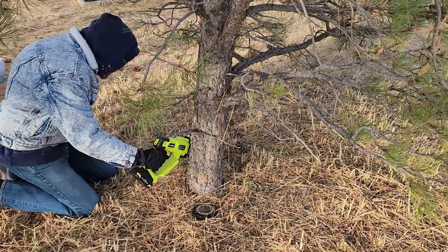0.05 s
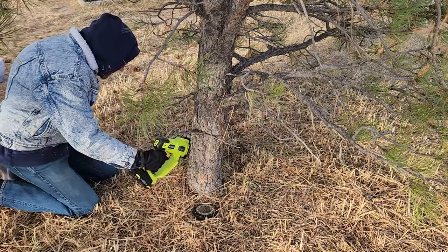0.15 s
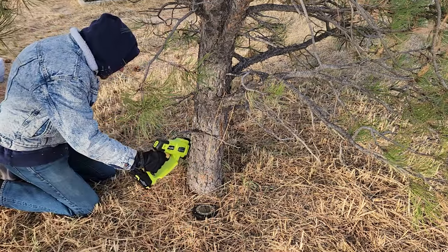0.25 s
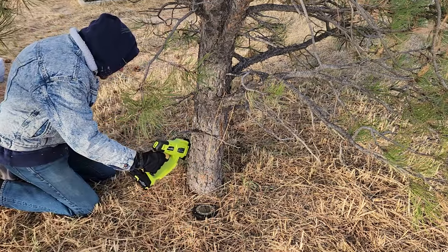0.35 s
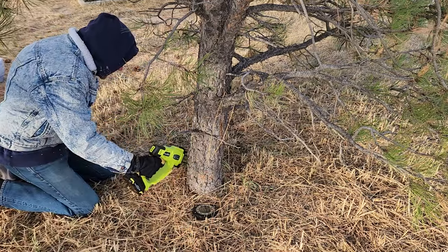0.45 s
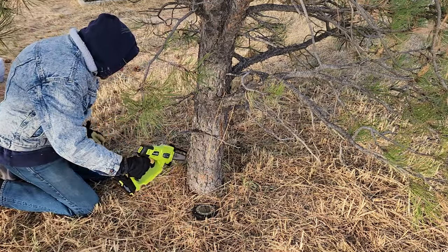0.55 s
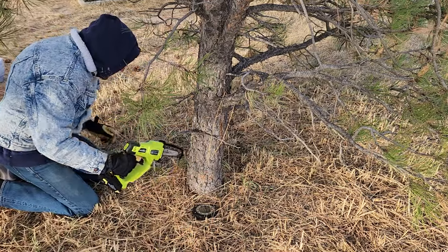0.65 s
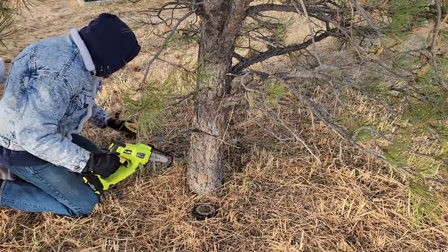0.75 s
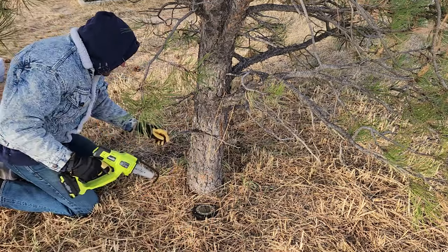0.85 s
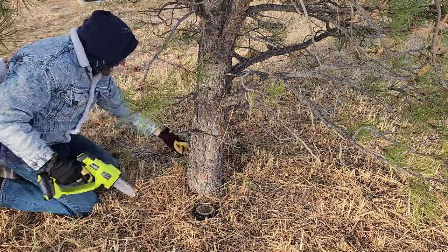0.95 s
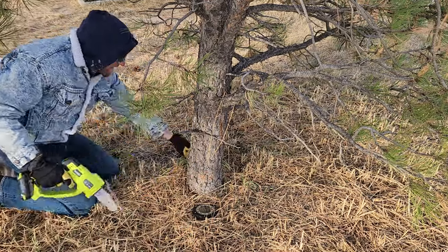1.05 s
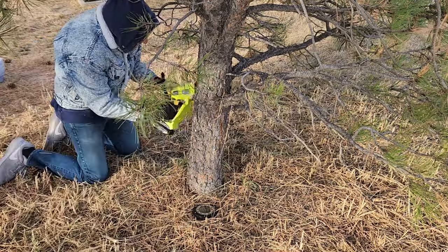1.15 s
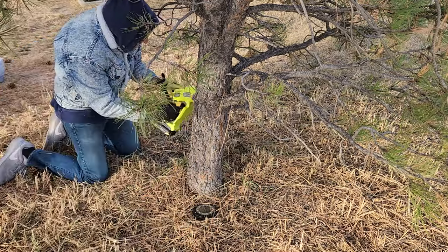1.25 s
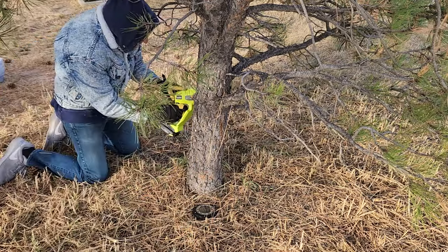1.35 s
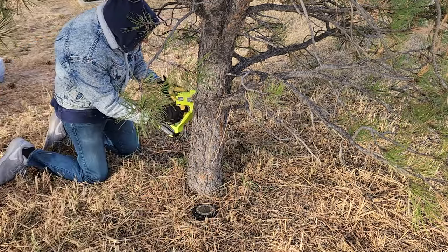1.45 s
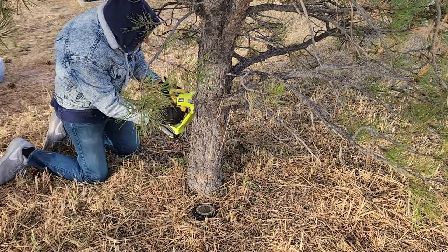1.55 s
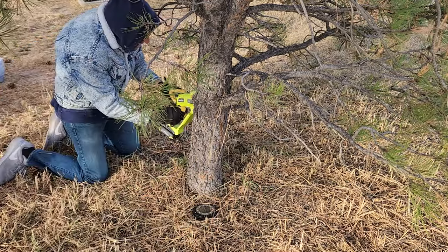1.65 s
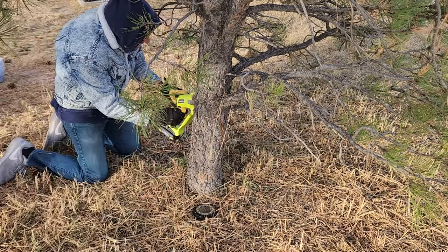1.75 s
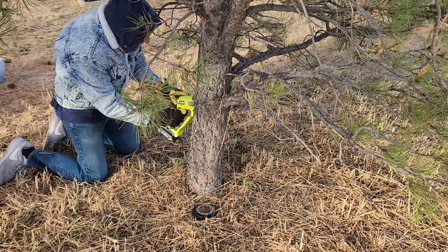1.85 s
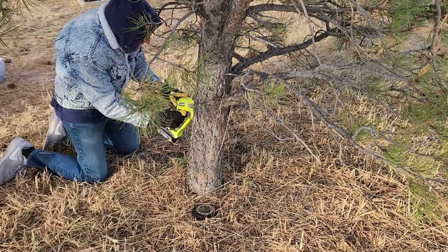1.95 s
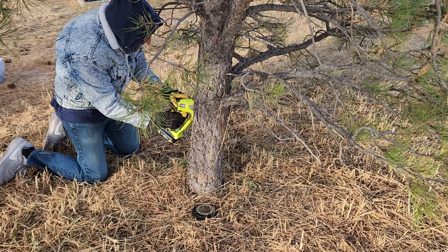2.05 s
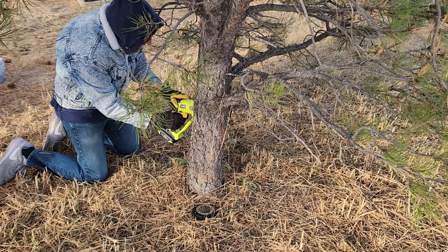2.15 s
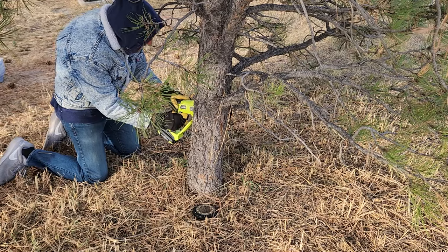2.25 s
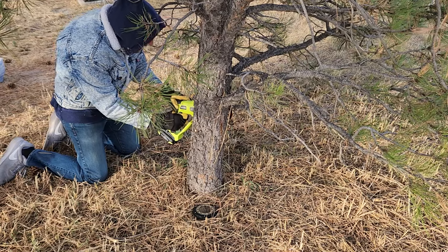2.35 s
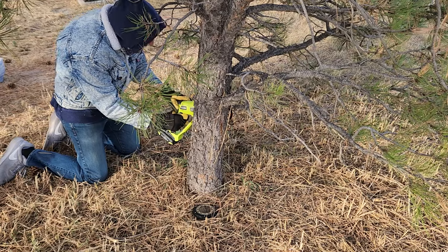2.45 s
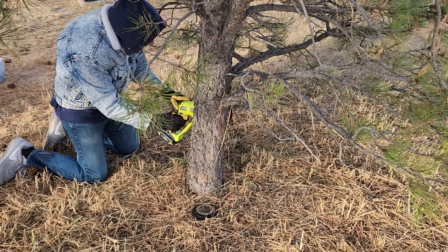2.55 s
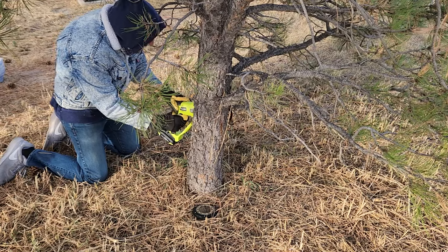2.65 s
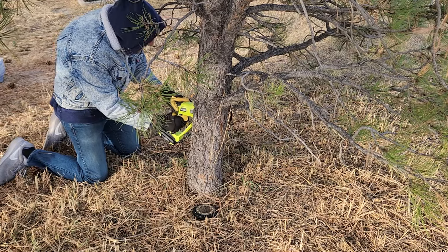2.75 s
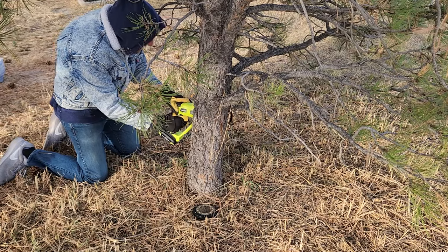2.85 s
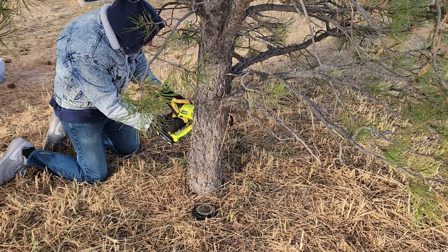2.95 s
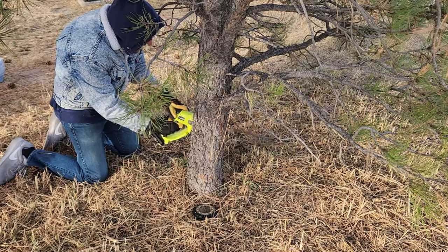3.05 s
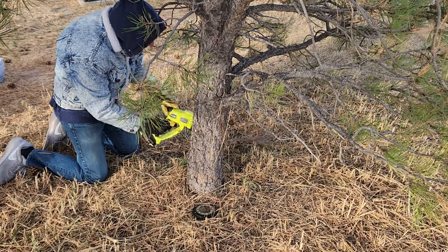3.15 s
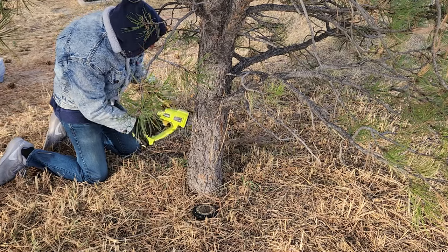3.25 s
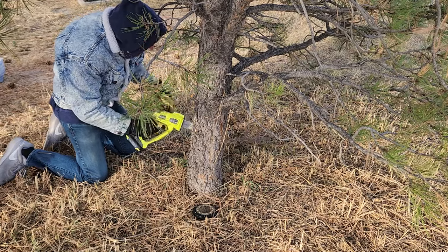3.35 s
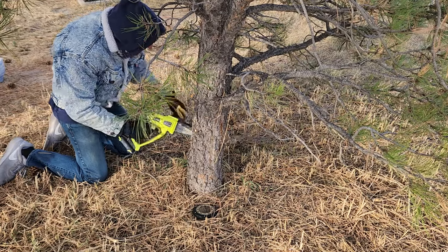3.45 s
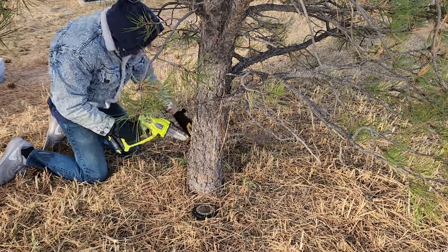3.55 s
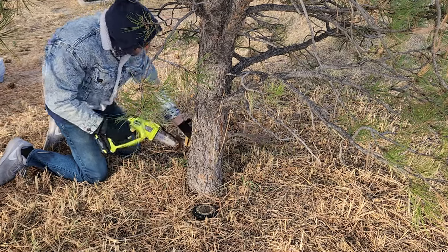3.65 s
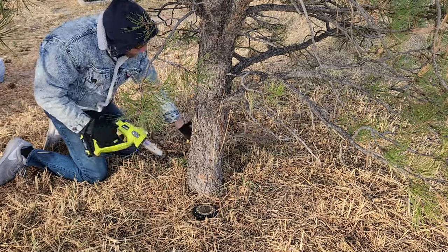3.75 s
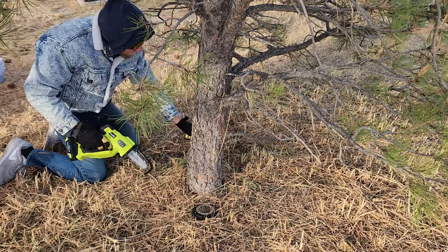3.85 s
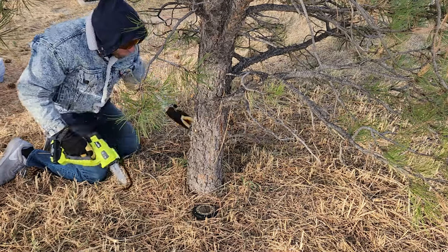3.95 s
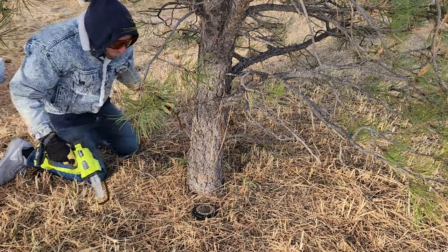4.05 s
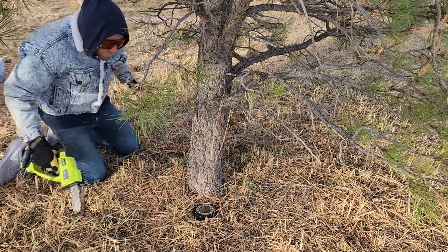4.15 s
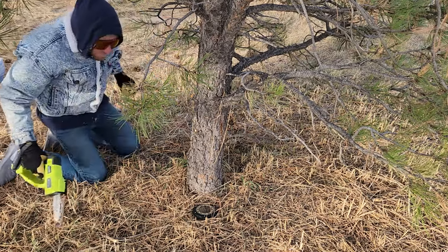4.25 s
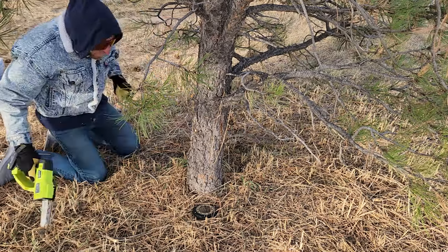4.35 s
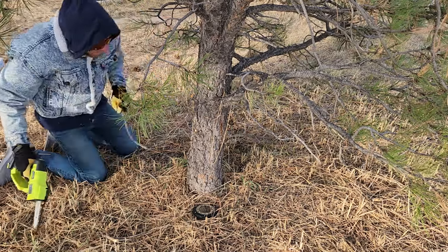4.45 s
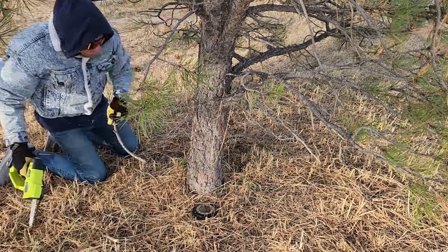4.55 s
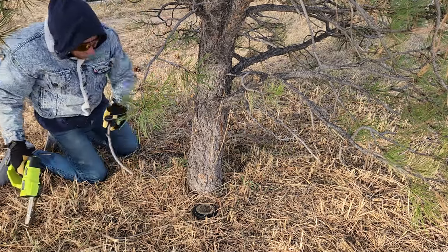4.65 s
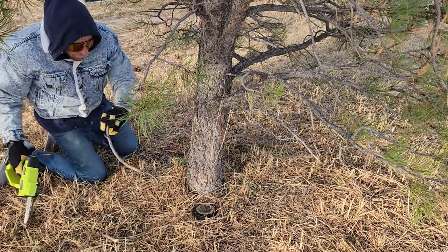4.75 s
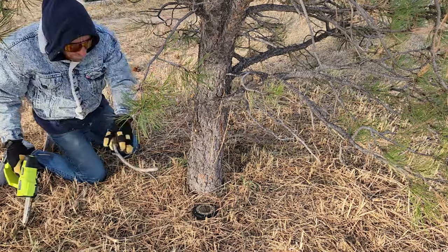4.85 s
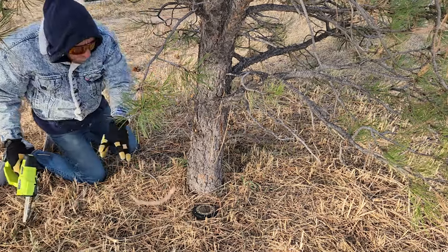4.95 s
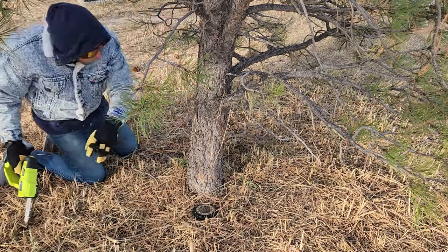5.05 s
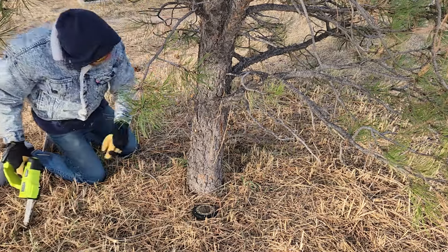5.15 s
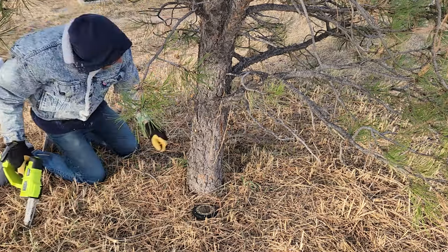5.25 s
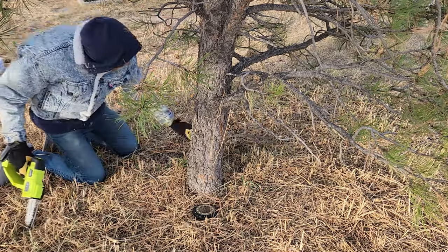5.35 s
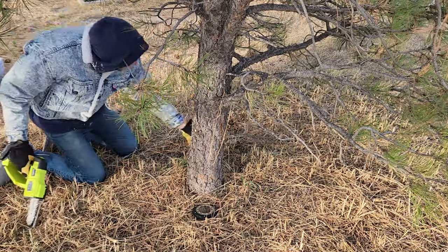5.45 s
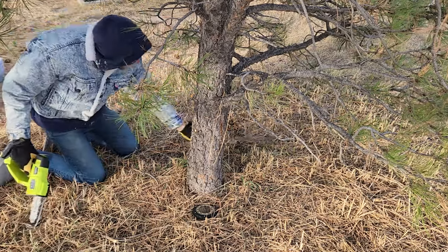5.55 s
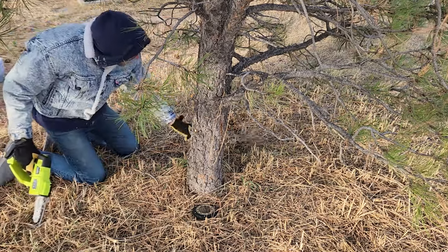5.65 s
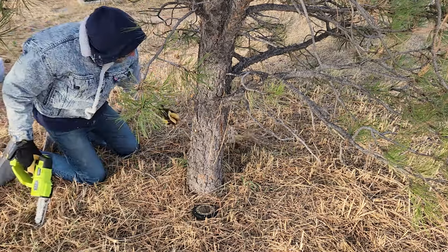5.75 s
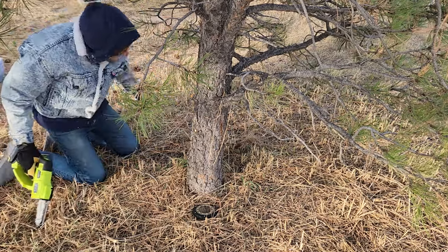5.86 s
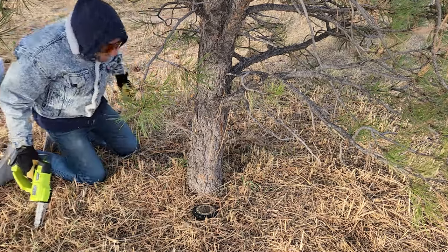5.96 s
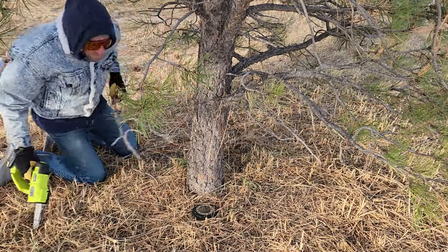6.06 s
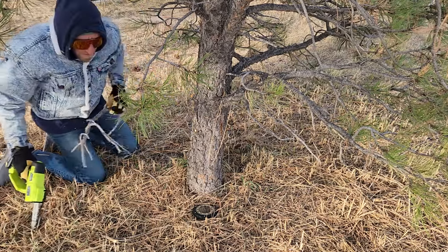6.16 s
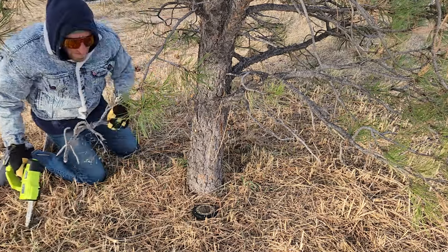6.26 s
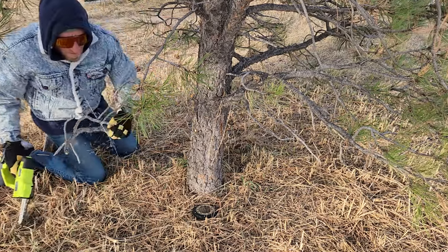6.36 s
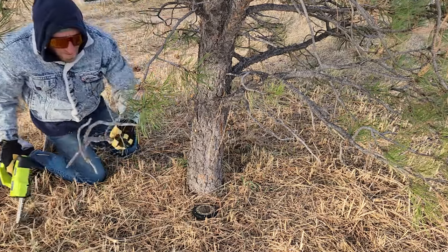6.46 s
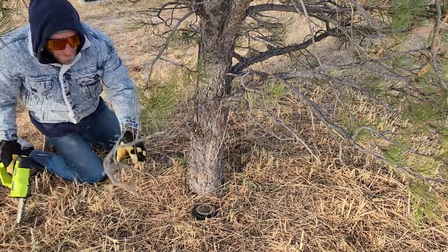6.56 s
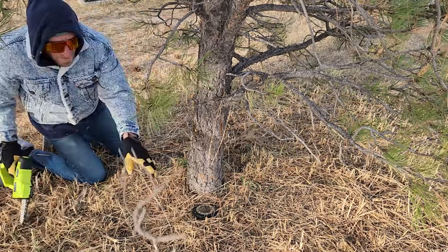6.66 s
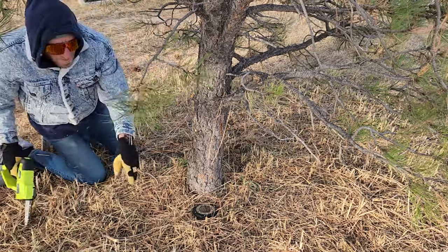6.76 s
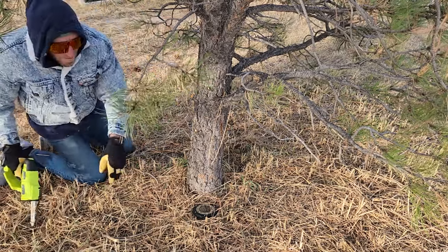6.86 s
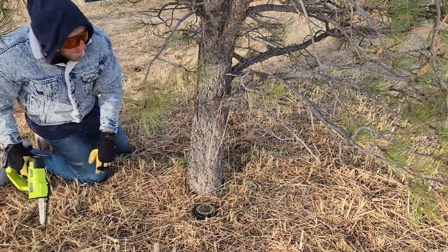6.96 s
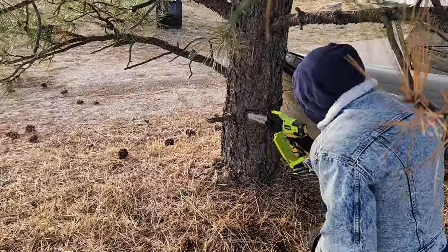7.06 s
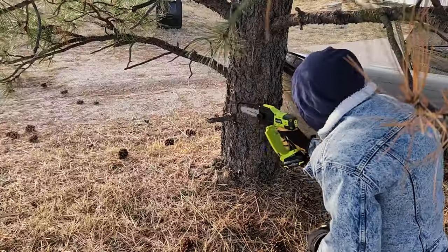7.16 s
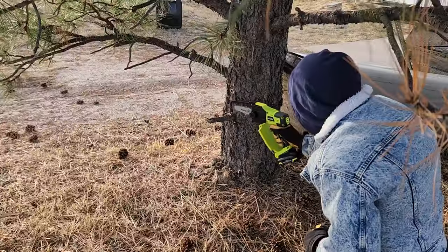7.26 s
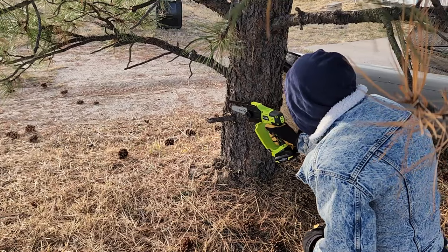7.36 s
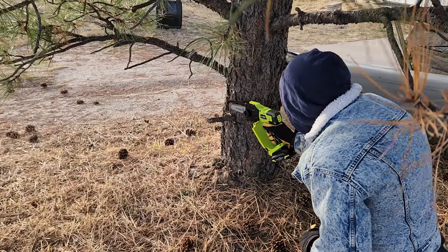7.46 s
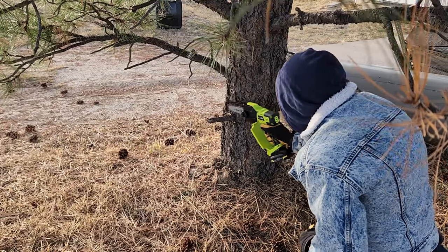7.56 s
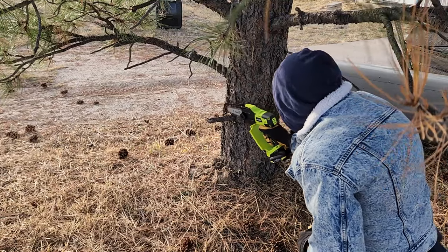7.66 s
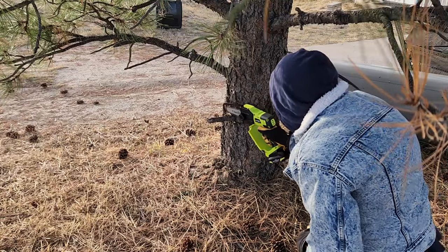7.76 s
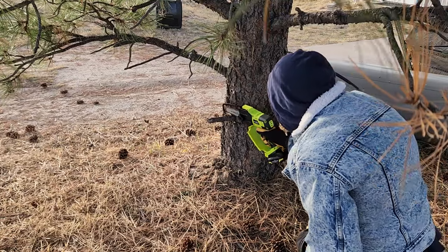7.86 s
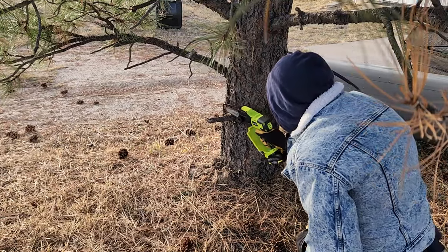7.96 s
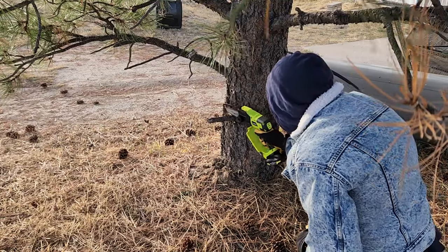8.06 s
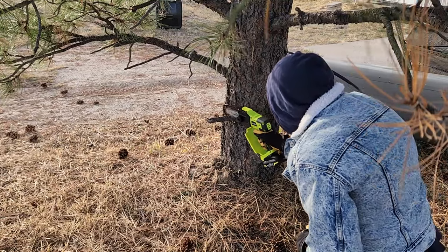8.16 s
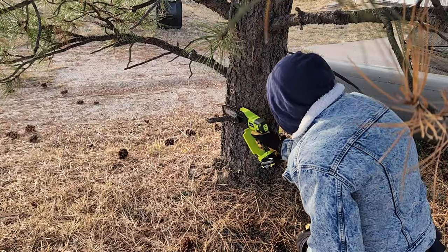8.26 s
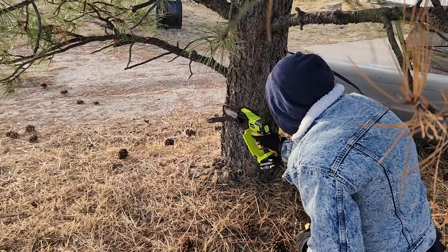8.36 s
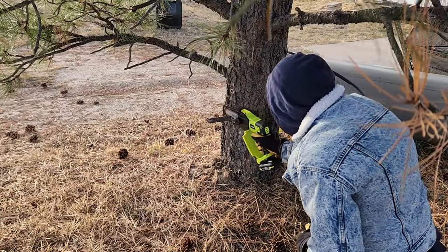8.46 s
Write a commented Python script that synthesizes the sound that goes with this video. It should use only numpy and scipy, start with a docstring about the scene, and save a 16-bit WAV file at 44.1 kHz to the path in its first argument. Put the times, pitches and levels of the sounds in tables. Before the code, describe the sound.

Outdoors, a small electric chainsaw whines and bites into wood, stops while twigs snap in dry grass, then cuts again as gusts hit the microphone.

```python
"""A small battery chainsaw cuts three dead twigs off a pine, outdoors over dry grass.
It starts in the wood, slowed down, its cutters knocking; released, it coasts to a stop with a clacking chain.
At 1.5 s it starts again: the chain rattles round the sprocket, the gears whine, it cuts and coasts.
From 4 s sleeves rustle in the grass, and twigs snap and are tossed into it. Near 7 s a gust buffets
the microphone; then the saw starts once more and bites into the third twig. A distant hush lies under it all."""
import sys
import numpy as np
from scipy import signal
from scipy.fft import rfft, irfft
from scipy.io import wavfile
from scipy.ndimage import uniform_filter1d

SR = 44100
rng = np.random.default_rng(int(sys.argv[2]) if len(sys.argv) > 2 else 0)


def materialize(psi):
    """Save the field psi as 16-bit PCM at rate SR to the path in sys.argv[1].

    A 1-D psi becomes a single channel; in a 2-D psi each row is a channel.
    """
    bounded = np.clip(np.atleast_2d(psi).T, -1, 1)
    quanta = np.round(bounded * 32767).astype(np.int16)
    wavfile.write(sys.argv[1], SR, quanta)


N = 375290
T = np.arange(N) / SR
FULL_SPEED = 354   # chain links per second

# tone colour of dry grass: f/Hz, level/dB
GRASS_COLOUR = [(880, -31), (1500, -11), (2500, -14.5), (3700, -8.5), (4500, -8.5), (7400, -1.5),
                (9600, -11.5), (12600, -6.5), (14000, -9), (16000, -11)]


def saw(split_hz=3500, soft_hz=1300, knock_creep=0.18, hiss_creep=0.17):
    """Chain and cutters shake the housing and branch: a low knock and a high hiss, plus whine and whirr."""
    # one row for each of the three runs: knock/dB, hiss/dB, start-up whine against the knock/dB
    run_levels = [(-41, -40.5, 0.5), (-42.5, -44, -4), (-39, -34, -10)]
    # tone colour, one list per run: f/Hz, running free/dB, in the wood/dB
    colours = [
        [(150.2, -30, -13), (302.3, -5.5, -6.5), (495, -12.5, -17), (800, -7.5, -1), (1102, -0.5, -6.5),
         (1432, -0.5, 0), (1714, -5, -5), (2020, -7, -2), (2660, -2, -5), (3480, -1, -1.5), (4500, -1, -4.5),
         (5900, -5, -9), (7540, -4, -11), (9510, -10, -24), (11590, -6.5, -12.5), (12740, -7.5, -13.5),
         (14000, -10.5, -18.5), (16000, -8, -20.5)],
        [(150, -30, -6.5), (300, -15, -10), (480, -16, -5), (760, -5, 2), (1100, -5, -3), (1390, 1.5, 3.5),
         (1715, -6, -6.5), (2120, -8, -4), (2580, -6, -9), (3700, -7, -2.5), (4630, -12, -6.5),
         (6140, -14.5, -13), (7450, -12, -12), (8950, -18, -18), (11800, -16.5, -13), (12800, -19.5, -18.5),
         (14000, -21.5, -16), (16000, -20.5, -23)],
        [(149.7, -46, -4.5), (298, -20, -6.5), (484, -12, -8), (745, -6, -4.5), (1090, -3, -0.5), (1380, 2, -6),
         (1760, -2.5, -5.5), (2120, 2.5, 0), (2600, 3, -2), (3430, -2.5, -1), (4630, -3.5, -2), (6230, -5, -3),
         (7700, -1.5, -3.5), (9440, -6.5, -5), (11300, 2, 0.5), (12800, 1, -1), (14000, -3.5, -2),
         (16010, -5, -5.5)],
    ]
    # where the saw is when running free, per run: left lead/s, left over right/dB, f/Hz, share (see stereo_noise)
    free_places = [(.00011, 3.5, 2700, .56), (.0001, 3.5, 3200, 0.55), (.00002, 2.5, 5200, 0.84)]
    # the same columns for the saw in the wood
    wood_places = [(.00009, 3.5, 4500, .58), (.0001, 3, 3000, 0.43), (.00001, 3, 4580, 0.63)]
    # the motor's airy whirr against the hiss, per run: level/dB
    whirr_db = [4.5, -3, -21]
    # the cutters lose their grip for a moment: middle/s, length/s, change/dB
    slips = [(.346, .014, -5.5), (2.579, 0.028, -4), (2.67, .014, -5), (8.159, 0.016, -5),
             (8.295, .02, -1.5), (8.446, 0.024, -6.5)]
    # the whole chain shakes while coasting: middle/s, length/s, knock rise/dB
    shakes = [(1.081, 0.0084, 4), (3.514, 0.021, 4.5), (3.803, 0.028, 5.5), (3.946, 0.035, 8)]
    # bands where the left side hears more of the saw, or less: low/Hz, high/Hz, share
    side_bands = [(5700, 8200, .26), (9300, 11900, -0.24), (12600, 18000, .15)]

    free_hz, coasting, starting, gates = motor()
    load, sag, knock_rise, hiss_rise = wood_contact()
    hz, speed = np.maximum(free_hz - sag, 10), free_hz / FULL_SPEED
    slip_db = sum(db * swell(s, length) for s, length, db in slips)
    knock_rise = knock_rise + slip_db + sum(db * swell(s, length) for s, length, db in shakes)
    # below the "creep" shares of full speed the chain falls quiet
    coast_knock = speed ** 0.19 / (1 + (knock_creep / speed) ** 2)
    knocking = from_db(knock_rise) * (1 - coasting + coasting * coast_knock)
    hissing = from_db(hiss_rise + slip_db / 2) * speed ** 0.44 / (1 + (hiss_creep / speed) ** 2)
    softness = np.clip(0.88 * coasting * (1 - speed), 0, 1)   # slow links land softly and sound dull
    wobble = (.0015 + .03 * load + .004 * coasting) * drift(90) + .0006 * drift(12)
    links = np.cumsum(hz * (1 + wobble)) / SR   # how many links have gone by
    rattle = chain(links, hz) * np.sqrt(1 - load)
    chips = cutters(links) * np.sqrt(load)
    whirr = motor_whirr(links, hz, load, rattle)
    out, leftward = np.zeros((2, N)), from_db([[1.7], [-1.7]])
    for run, (knock_db, hiss_db, start_db) in enumerate(run_levels):
        knock, hiss = from_db(knock_db) * knocking, from_db(hiss_db) * hissing
        colour_hz, free_db, wood_db = np.transpose(colours[run])
        body = coloured(rattle * stereo_noise(*free_places[run]), np.c_[colour_hz, free_db])
        body += coloured(chips * stereo_noise(*wood_places[run]), np.c_[colour_hz, wood_db])
        body = ringing(filtered(body, 68, "high", order=2), run)
        low = evened(filtered(body, split_hz, "low", order=5))
        high = evened(filtered(body, split_hz, "high", order=5))
        noise = knock * from_db(-1.5) * (low - softness * filtered(low, soft_hz, "high", order=1))
        noise += hiss * (from_db(-0.67) * high + from_db(whirr_db[run]) * whirr * leftward)
        loose_gears = loose_whine(links, hz, run) * (coasting + from_db(start_db) * starting)
        tones = knock * (driven_whine(links, hz, load, coasting, run) + loose_gears) * leftward
        out += gates[run] * (noise + ringing(tones, run))
    side = sum(share * filtered(out, band, "band", order=1) for *band, share in side_bands)
    return out + side * [[1], [-1]]


def motor(spin_up_s=.046, start_whine_s=0.074, unload_s=.085, edge_s=0.012):
    """The motor speeds up when the trigger is pulled; once it is released, friction and drag stop it."""
    # one row per run: pulled/s, released/s, stopped/s, top speed/(links/s), friction/(links/s^2), drag time/s
    runs = [(-1, .533, 1.198, 354, 316, 1.5), (1.5, 3.125, 4.09, 354, 219, 1.03),
            (7.417, 9, 10, 356.8, 219, 1.03)]
    hz, coasting, starting = np.zeros((3, N))   # links per second, then two amounts from 0 to 1
    gates = []   # each is 1 during its run and 0 outside it
    for pulled, released, stopped, top, friction, drag_s in runs:
        driven_s, coast_s = np.maximum(T - pulled, 0), np.maximum(T - released, 0)
        driven_hz = top * (1 - np.exp(-driven_s / spin_up_s))
        turning = (T > pulled) & (T < stopped)
        hz += turning * ((driven_hz + friction * drag_s) * np.exp(-coast_s / drag_s) - friction * drag_s)
        coasting += turning * ramp(released, unload_s) ** 2
        starting += turning * np.exp(-driven_s / start_whine_s)
        gates.append(ramp(pulled, edge_s) * (1 - ramp(stopped - edge_s, edge_s)))
    return np.maximum(hz, 10), coasting, starting, gates


def wood_contact(slow_down_s=.11, recover_s=.04, let_go_s=.014, full_load_sag=80):
    """Wood grips the chain, slows the motor and makes knock and hiss louder until the chain comes free."""
    # the chain meets wood: enters/s, grip time/s, comes free/s, speed lost/(links/s), knock rise/dB, hiss rise/dB
    cuts = [(-.5, .05, .002, 80, 8, 6.5), (.018, 0.0034, .275, 77, 9, 6), (.29, 0.009, 0.39, 77, 10, 6.5),
            (2.26, 0.019, 2.35, 11.7, 3, 0.5), (2.39, 0.065, 2.47, 16, 6.5, 4),
            (2.48, 0.078, 2.934, 72, 8.5, 6), (8.131, 0.016, 10, 115, 9, 6.5)]
    load, sag, knock_db, hiss_db = np.zeros((4, N))
    for enters, grip_s, free, lost, knock_rise, hiss_rise in cuts:
        inside_s, after_s = np.clip(T - enters, 0, free - enters), np.clip(T - free, 0, 1)
        grip = ramp(enters, grip_s) * np.exp(-after_s / let_go_s)
        sag += lost * (1 - np.exp(-inside_s / slow_down_s)) * np.exp(-after_s / recover_s)
        load += grip * min(lost / full_load_sag, 1)
        knock_db += grip * knock_rise
        hiss_db += grip * hiss_rise
    knock_db += load * drift(61)   # the grip wavers
    return np.clip(load, 0, 1), sag, knock_db, hiss_db


def chain(links, hz, throb=0.21, slide=1.3):
    """Links slap and slide on sprocket and bar, throbbing once per turn of the seven-tooth sprocket."""
    sprocket = np.cos(2 * np.pi * links / 7)
    pace = np.minimum(hz / 300, 1)
    force = blows(links, spread_db=2.4, t60=.010) * np.sqrt(pace) + slide
    return evened(force * (1 + throb * pace * sprocket) * from_db(.5 * drift(400)))


def cutters(links, chatter=0.14, tearing=1.4):
    """A cutter on every second link knocks out a chip; wood fibres tear in between."""
    sprocket = np.cos(2 * np.pi * links / 7)
    force = blows(links / 2, spread_db=1.8, t60=.016) + tearing
    return evened(force * (1 + chatter * sprocket))


def driven_whine(links, hz, load, coasting, run):
    """Driven gears sing, shaken by their slack. High tones need high speed, and wood muffles them all."""
    # gear tones against the knock: multiple of the link rate, run 1/dB, run 2/dB, run 3/dB
    gear_tones = [(1, -23, -23.5, -21), (1.75, -26, -20, -26), (2, -24, -22, -19), (3, -12, -13, -27),
                  (4, -16, -6.5, -16.5), (5, -21, -14, -26), (6, -24, -24, -19), (7, -26, -18, -19),
                  (13, -27, -27, -18), (18, -7.5, -21, -10)]
    tones = np.zeros(N)
    for multiple, *run_db in gear_tones:
        level = from_db(run_db[run] + 2.3 * drift(55)) * (hz / FULL_SPEED) ** (1 + multiple / 2)
        tones += level * np.sin(2 * np.pi * multiple * links + .3 * drift(150))
    return np.sqrt(2) * tones * (1 - coasting) * from_db(-12 * load)


def loose_whine(links, hz, run):
    """Unloaded gears sing and fade as the chain slows; the wobbling sprocket sways their pitch."""
    # gear tones: multiple of the link rate, run 1/dB, run 2/dB, run 3/dB
    gear_tones = [(4, -14, -20, -16), (5, -5, -3, -6), (6, -20, -21, -20), (7, -19, -17, -17)]
    sway = .27 * (np.sin(2 * np.pi * links / 7) + .5 * drift(200))
    tones = np.zeros(N)
    for multiple, *run_db in gear_tones:
        tones += from_db(run_db[run] + 2.2 * drift(110)) * np.sin(2 * np.pi * multiple * links + sway)
    return tones * np.minimum(hz / 125, 1) ** 4 * (hz / 240) ** 0.6


def motor_whirr(links, hz, load, rattle, multiple=38):
    """An airy band of motor noise follows the speed in pitch and flutters with the links."""
    flutter = rms_one(filtered(stereo_noise(0, 0, 1000), 2500, "low", order=2)) * rattle
    band = filtered(flutter * np.sin(2 * np.pi * multiple * links), 13800, "low")
    return band * np.sqrt(1 - load) * hz / FULL_SPEED


def ringing(x, run, echo_db=-12):
    """Bar, cover and branch ring at their own pitches; trunk and ground add a quick echo."""
    # ringing pitches: f/Hz, width/Hz, run 1/dB, run 2/dB, run 3/dB
    rings = [(805, 35, -2.5, -27, -26), (1134, 52, -11, -15, -8), (1410, 71, -6, -31, -23),
             (1987, 47, 7, -1, -3), (2064, 100, -13, -2, -4), (2600, 120, -12, -4, -8),
             (3080, 130, -8, -24, 1), (4140, 110, -1.5, -3.5, -18), (4620, 280, -10.5, -5.5, 1.5),
             (5415, 240.5, -11, -4, -1), (7630, 680, -9.5, -7.5, -4.5), (12930, 410, -3, 3, -5)]
    # echo delay: left/s, right/s
    delays = (0.0018, .0027)
    out = x.copy()
    for hz, width_hz, *run_db in rings:
        b, a = signal.iirpeak(hz, hz / width_hz, fs=SR)
        out += from_db(run_db[run]) * signal.lfilter(b, a, x)
    echo = np.array([np.roll(side, round(s * SR)) for side, s in zip(out, delays)])
    return out + from_db(echo_db) * echo


def cutter_bites():
    """Now and then a cutter catches hard and makes the branch or bar ring."""
    # catches: t/s, level/dB, ring/Hz, ring against the knock/dB
    bites = [(.020, -31.5, 835, -3.5), (.036, -32, 814, 4.5), (.063, -31.5, 1040, -2.5),
             (.082, -27.5, 2000, 2), (.114, -30.5, 840, 0.5), (.145, -27, 790, 3),
             (.151, -29.5, 1500, -1.5), (.168, -29, 1500, -7), (.204, -28.5, 790, -4),
             (.213, -30, 2000, -7), (.27, -27, 730, 2), (.302, -30, 2000, 1), (.309, -35, 1750, 9.5),
             (.323, -28.5, 1800, 8.5), (.332, -31, 1880, 8), (.353, -23.5, 1790, 9), (.365, -33.5, 890, -1),
             (2.286, -38, 1305, -7), (2.454, -35, 1400, -10), (2.557, -34.5, 1100, -2),
             (2.709, -32, 1340, 1), (2.687, -34, 1100, 5), (2.75, -33, 1100, 0), (2.798, -35.5, 1103, -1),
             (2.853, -28, 833, 0), (2.862, -34, 1010, 3), (2.903, -28.5, 1103, -1), (2.935, -32, 793.4, 7),
             (8.143, -30.5, 2095, -9), (8.173, -25, 1111, -8), (8.195, -34, 2600, -8),
             (8.226, -28, 2107, -20), (8.312, -29.5, 2110, -10), (8.335, -30, 1100, -13),
             (8.376, -28.5, 2100, -4.5), (8.425, -28, 2100, -11), (8.464, -32, 2100, -7)]
    return knocks(bites, (.00008, 3.5, 5000), t60=0.034, rise_s=0.00093, width=.09, broad_hz=3200)


def chain_clacks(ring_db=8):
    """The slack chain clacks on the bar and makes it ring."""
    # clacks: t/s, level/dB, ring/Hz
    clacks = [(.472, -37, 1480), (.638, -47, 1125), (.914, -41, 1186), (.966, -44, 1220),
              (1.012, -46, 1180), (1.076, -44, 1090), (1.146, -48, 1160), (3.43, -45, 1228),
              (3.51, -47, 1153), (3.604, -45, 1250), (3.649, -41.5, 1130), (3.915, -57, 1092),
              (7.419, -37.5, 3100), (7.465, -42, 2550), (7.488, -34, 2560), (7.533, -47, 2548),
              (7.572, -38, 2300), (7.67, -37, 2350)]
    rows = [(*row, ring_db) for row in clacks]
    return knocks(rows, (.00009, 3.5, 5000), t60=0.035, rise_s=0.0032, width=0.041, broad_hz=2500)


def chain_jerks():
    """The chain jerks tight, clatters or catches as it stops; once, a twig cracks through."""
    # jolts: t/s, peak/dB, f/Hz, fade time/s, crack/dB
    jerks = [(1.5035, -16.5, 2750, 0.022, -1), (1.53, -31.5, 1300, 0.26, -19.5),
             (7.418, -32, 960, 0.057, 5), (.387, -15.5, 4440, .02, -2), (1.142, -38, 5800, 0.045, -10)]
    return snaps(jerks, (.00006, 3.5, 9000), width=1.36)


def twig_snaps():
    """Dry twigs break or land in the grass."""
    # snaps and landings: t/s, peak/dB, f/Hz, fade time/s, crack/dB
    twigs = [(4.283, -57, 5100, 0.019, 0), (4.9085, -56, 6240, .015, -8), (4.971, -58, 6360, .015, -8),
             (5.1325, -49, 6000, .06, 0), (5.1375, -36.5, 1850, 0.091, 8), (5.146, -47, 1040, .09, -8),
             (5.153, -37.5, 2380, 0.048, 4), (5.2365, -40, 1900, 0.048, -14), (5.238, -46, 900, .08, -17),
             (5.267, -48, 4900, 0.034, -16), (5.425, -50.5, 10940, 0.014, 0), (5.567, -49, 2960, 0.042, 7),
             (6.4576, -53, 5500, .04, -7), (6.513, -50, 6800, 0.042, -6), (6.785, -35, 7030, 0.098, 20),
             (6.804, -28, 5440, 0.086, 2.5), (6.838, -42, 1260, 0.12, 12), (6.912, -47, 1010, 0.14, 12),
             (6.87, -43, 4300, 0.034, 2), (6.897, -40, 6200, 0.05, 12), (6.952, -50, 2500, .04, 7),
             (7.123, -47, 7440, 0.1, 5), (7.191, -51, 9150, 0.033, 8), (7.2503, -50, 5600, 0.02, 10),
             (7.3356, -52, 5160, .02, 1), (7.363, -51, 1300, 0.034, -7)]
    return snaps(twigs, (.00003, 2.8, 6000), width=1.28)


def stalk_pings(ring_db=16):
    """Springy stalks flick back and ping."""
    # pings: t/s, level/dB, f/Hz
    pings = [(7.022, -61, 7200), (7.041, -54, 7000), (7.056, -62, 6800), (7.096, -62, 7300)]
    rows = [(*row, ring_db) for row in pings]
    return knocks(rows, (.00003, 3, 6000), t60=0.018, rise_s=0.00036, width=0.04, broad_hz=6000)


def rustle():
    """Tiny stalks rub under sleeves and knees, and some snap; cloth on pine needles sounds brighter."""
    # grass and needles are stirred: middle/s, length/s, level/dB
    stirs = [(4.25, 0.7, -76), (4.88, 0.35, -68), (5.28, 0.28, -72.5), (5.53, 0.28, -67.5),
             (5.735, 0.16, -60), (5.92, 0.38, -73), (6.17, 0.32, -77.5), (6.37, 0.17, -73),
             (6.49, 0.1, -61.5), (6.61, 0.039, -71.5), (6.68, 0.32, -71.5), (6.83, 0.21, -59.5),
             (7.04, 0.36, -62), (7.3, 0.29, -65.5)]
    # a sleeve brushes the needles: middle/s, length/s, level/dB
    brushes = [(5.735, 0.12, -59)]
    stalks = from_db(-1.5 * drift(900) + 1.4 * drift(70)) * stereo_noise(.00005, 5, 7000)
    grass = (rms_one(coloured(stalks, GRASS_COLOUR)) + from_db(-2) * crackle()) * swells(stirs)
    sleeve = rms_one(filtered(stalks, [9000, 16000], "band", order=2)) * swells(brushes)
    return from_db(-0.5) * (grass + sleeve)


def crackle(snaps_per_s=170):
    """Single dry stalks snap at random and in clumps, each with a brief tick."""
    snapped = rng.random(N) < snaps_per_s * from_db(4 * drift(14)) / SR
    sizes = snapped * from_db(4.5 * np.minimum(rng.exponential(1, N), 2.7))
    ticks = fading(sizes, t60=.005) * stereo_noise(.00005, 5, 5000)
    return rms_one(coloured(ticks, GRASS_COLOUR))


def gusts(split_hz=90):
    """Wind buffets the microphone; some puffs are deep and some reach higher."""
    # puffs: middle/s, length/s, level/dB, upper part against the deep part/dB
    puffs = [(0.367, 0.17, -49, -12), (3.55, 0.47, -60.5, 6), (6.343, 0.29, -49, -15),
             (6.519, 0.046, -42, -19), (6.654, .05, -48, -15), (7.151, 0.1, -32, 4), (7.233, 0.026, -31, 3),
             (7.291, 0.069, -28.5, -3.5), (7.381, 0.029, -24, -5.5), (7.443, 0.024, -42, -12),
             (7.561, 0.039, -28, -35), (7.712, 0.081, -43, -18), (7.939, 0.11, -36.5, -17),
             (8.274, 0.041, -38, 12), (8.406, 0.1, -31, 1.5), (8.5, 0.085, -37, 3)]
    # tone colour of the swirling air: f/Hz, level/dB
    colour = [(12, -35.5), (20, -12), (38, 4.5), (62, 3), (149, -15.5), (377, -48.5), (443, -53.5),
              (500, -51.5), (650, -79.5), (1100, -120)]
    big_swirls = evened(wide_noise(colour, side_db=-16))
    small_swirls = evened(wide_noise(colour, side_db=-7))
    deep_gain = swells([(s, length, db) for s, length, db, _ in puffs])
    upper_gain = swells([(s, length, db + upper_db) for s, length, db, upper_db in puffs])
    deep = deep_gain * filtered(big_swirls, split_hz, "low", order=3)
    return deep + upper_gain * filtered(small_swirls, split_hz, "high", order=3)


def distant_air(hush_db=-65.5, rumble_db=-57):
    """A distant hush lies over the low rumble of moving air."""
    # tone colour of the background: f/Hz, level/dB
    colour = [(12, -43.5), (20, -14.5), (37, 3.5), (152, 0), (216, -18.5), (310, -13), (347, -15),
              (574, -21), (642, -24.5), (1060, -31.5), (3160, -57), (3950, -44), (4420, -54.5), (5080, -51),
              (16000, -68.5)]
    # the hush slowly rises and falls: t/s, change/dB
    hush_changes = [(0, -0.5), (4.1, 5), (4.6, 1.5), (6.2, -1), (7, 0.5)]
    far = wide_noise(colour, side_db=-12)
    hush_gain = from_db(hush_db + np.interp(T, *np.transpose(hush_changes)))
    hush = hush_gain * rms_one(filtered(far, 172, "high", order=5))
    rumble = from_db(rumble_db + 0.7 * drift(3)) * rms_one(filtered(far, 165.3, "low", order=5))
    return hush + rumble


def knocks(rows, place, t60, rise_s, width, broad_hz):
    """Each knock is a short burst of noise with one narrow ring in it."""
    out, t, grain = np.zeros((2, N)), T[:SR // 8], stereo_noise(*place)
    shape = (1 - np.exp(-t / rise_s)) * from_db(-60 * t / t60)
    for s, db, hz, ring_db in rows:
        at = round(s * SR)
        burst = grain.take(at + np.arange(len(t)), axis=1, mode="wrap") * shape
        ring = rms_one(filtered(burst, [hz / (1 + width), hz * (1 + width)], "band", order=1))
        broad = rms_one(filtered(filtered(burst, broad_hz, "low", order=1), 640, "high"))
        # the level counts as if the whole knock fell within 10 ms
        sound = rms_one(broad + from_db(ring_db) * ring) * np.sqrt(.01 * SR / len(t))
        out[:, at:at + len(t)] += from_db(db) * sound[:, :N - at]
    return out


def snaps(rows, place, width, rise_s=0.00074, crack_t60=0.0057):
    """Each snap opens with a sharp, bright crack and dies away around one pitch."""
    out, t, grain = np.zeros((2, N)), T[:SR // 4], stereo_noise(*place)
    rise = 1 - np.exp(-t / rise_s)   # the fibres part one after another
    opening = from_db(11.5 - 60 * t / crack_t60)
    for s, db, hz, t60, crack_db in rows:
        span = slice(round(s * SR), round(s * SR) + len(t))
        burst = grain[:, span] * rise * (from_db(-60 * t / t60) + opening)
        ring = filtered(burst, [hz / width, min(hz * width, .45 * SR)], "band", order=2)
        broad = filtered(burst, [400, 5000], "band", order=1)
        bright = filtered(burst, [6800, 8200], "band", order=1)
        crack = filtered(broad + bright, 12000, "low", order=1)
        sound = rms_one(ring) + from_db(crack_db) * rms_one(crack)
        out[:, span] += from_db(db) * sound / np.abs(sound.mean(axis=0)).max()
    return out


def blows(count, spread_db, t60):
    """One fading blow of random strength each time the count passes a whole number."""
    strength = from_db(spread_db * np.clip(rng.standard_normal(N), -2, 2))
    hits = np.diff(np.floor(count), prepend=0) * strength
    return evened(fading(hits, t60), window_s=0.087)


def fading(hits, t60):
    """Gives each hit a tail that falls by 60 dB in t60 seconds (the fade time)."""
    return signal.lfilter([1], [1, -from_db(-60 / (t60 * SR))], hits + 1e-18)


def stereo_noise(lead_s, pan_db, apart_hz, share=0.5):
    """Noise reaches the left side first; above apart_hz only a share is direct, the rest is scattered."""
    source = rng.standard_normal(N)
    direct = np.array([source, np.roll(source, round(lead_s * SR))])
    treble = share * direct + np.sqrt(1 - share ** 2) * rng.standard_normal((2, N))
    grain = filtered(direct, apart_hz, "low", order=1) + filtered(treble, apart_hz, "high", order=1)
    return grain * from_db([[pan_db / 2], [-pan_db / 2]])


def wide_noise(colour, side_db):
    """Noise with a tone colour; a higher side_db makes left and right less alike."""
    mid, side = (coloured(rng.standard_normal(N), colour, size=16384) for _ in range(2))
    return mid + from_db(side_db) * side * [[1], [-1]]


def coloured(x, colour, size=4096):
    """Gives a sound the tone colour in a table of f/Hz, level/dB; white noise keeps its power."""
    hz, db = np.transpose(colour)
    log_hz = np.log(np.fft.rfftfreq(size, 1 / SR) + 1)
    log_gain = np.log(from_db(np.interp(log_hz, np.log(hz), db)))
    # folding onto the first half keeps the filter from sounding ahead of its input
    folded = irfft(log_gain) * (1 + np.sign(size // 2 - np.arange(size)))
    folded[0] /= 2
    response = irfft(np.exp(rfft(folded)))
    return signal.oaconvolve(np.atleast_2d(x), response[None] / np.linalg.norm(response), axes=1)[:, :N]


def filtered(x, hz, kind, order=4):
    """Keeps the lows, the highs or a band; a higher order cuts more steeply."""
    return signal.sosfilt(signal.butter(order, hz, kind, fs=SR, output="sos"), x)


def evened(x, window_s=0.049):
    """Takes out slow level changes and keeps fast ones."""
    power = np.atleast_2d(x).mean(axis=0) ** 2
    return x / np.sqrt(np.abs(uniform_filter1d(power, int(window_s * SR))) + 1e-12)


def drift(rate):
    """A random wander of typical size 1 that turns `rate` times a second."""
    points = rng.standard_normal(int(N / SR * rate) + 2)
    return rms_one(np.interp(T * rate, np.arange(len(points)), points))


def ramp(start_s, length_s):
    """Rises from 0 to 1."""
    return np.clip((T - start_s) / length_s, 0, 1)


def swell(middle_s, length_s):
    """A rounded hump of height 1."""
    return np.exp(-np.minimum(np.abs(2 * (T - middle_s) / length_s), 4) ** 2.5)


def swells(rows):
    """Joins humps (middle/s, length/s, level/dB) into one loudness curve."""
    return np.sqrt(sum((from_db(db) * swell(s, length)) ** 2 for s, length, db in rows))


def from_db(db):
    """Turns decibels into a plain multiplier."""
    return 10 ** (np.asarray(db) / 20)


def rms_one(x):
    """Scales a signal to an average (rms) level of 1."""
    return x / np.sqrt(np.mean(x ** 2) + 1e-20)


def scene():
    """Adds the short sounds, the saw, the grass and the air, in stereo."""
    short_sounds = chain_jerks() + twig_snaps() + cutter_bites() + chain_clacks() + stalk_pings()
    return short_sounds + saw() + rustle() + distant_air() + gusts()


def record(dry, cutoff_hz=15950):
    """Cuts off the very highest treble steeply."""
    return signal.sosfilt(signal.ellip(12, .1, 80, cutoff_hz, fs=SR, output="sos"), dry)


dry = scene()
out = record(dry)
materialize(out)
```